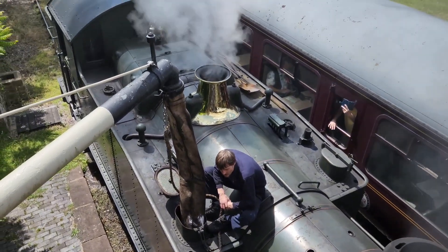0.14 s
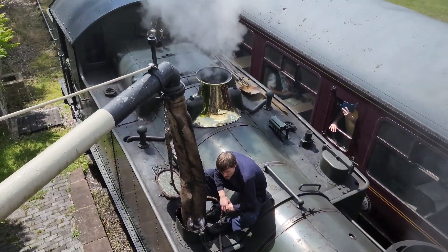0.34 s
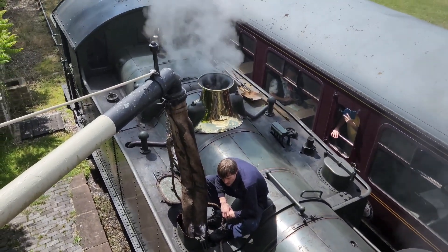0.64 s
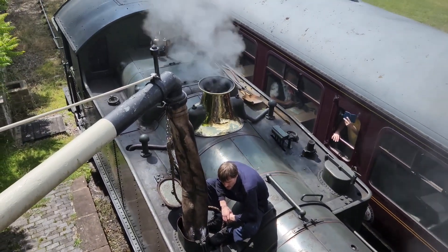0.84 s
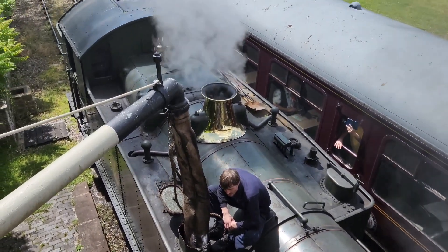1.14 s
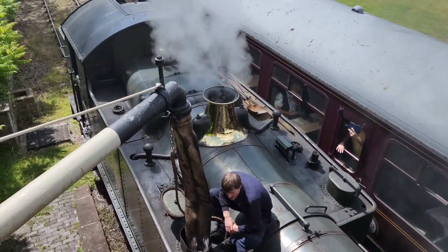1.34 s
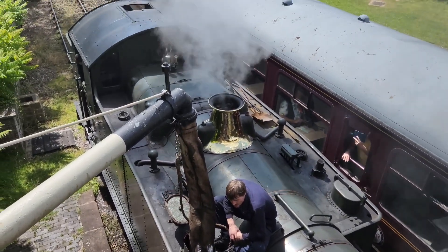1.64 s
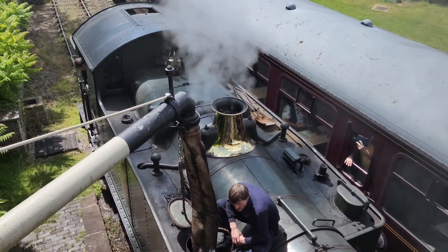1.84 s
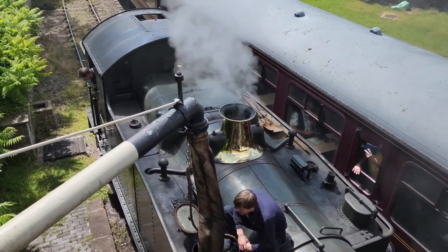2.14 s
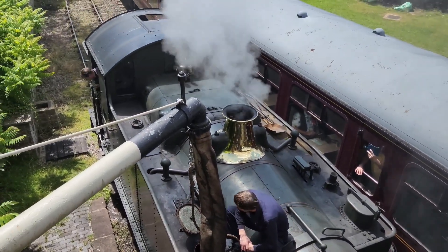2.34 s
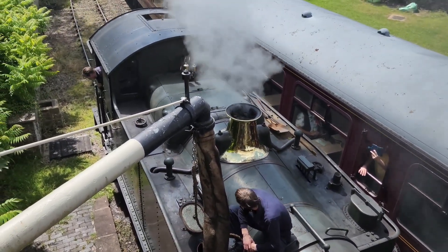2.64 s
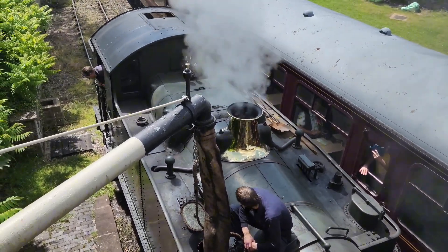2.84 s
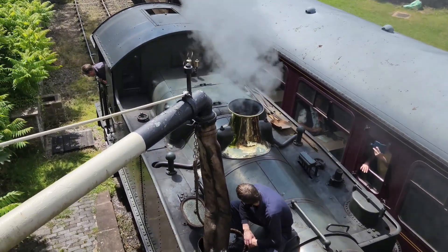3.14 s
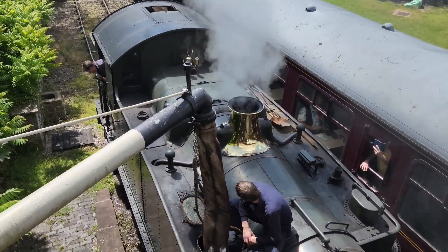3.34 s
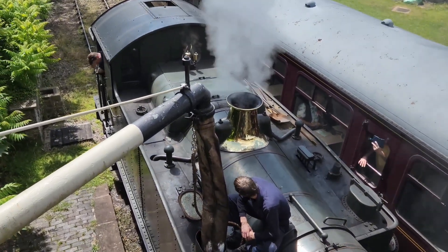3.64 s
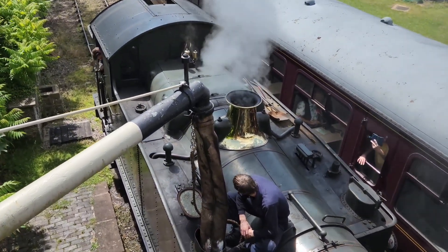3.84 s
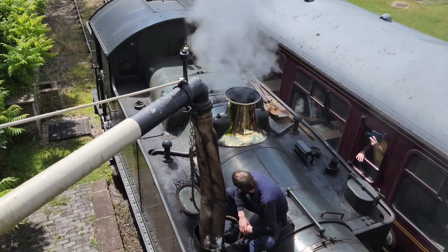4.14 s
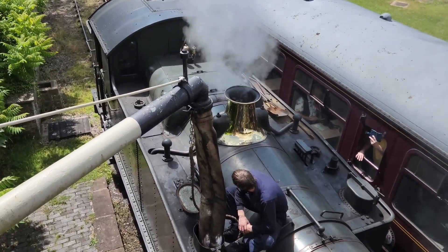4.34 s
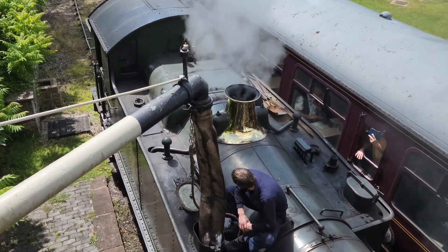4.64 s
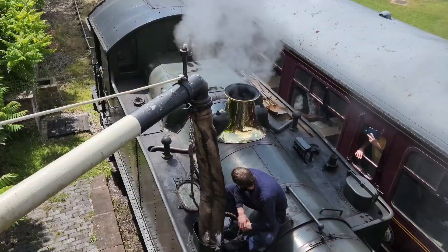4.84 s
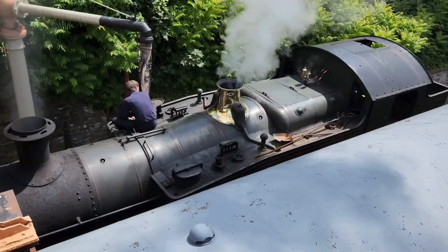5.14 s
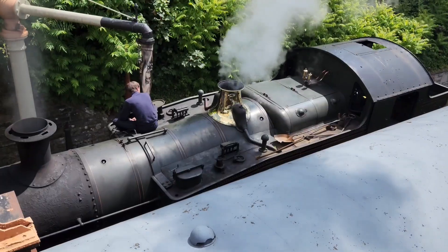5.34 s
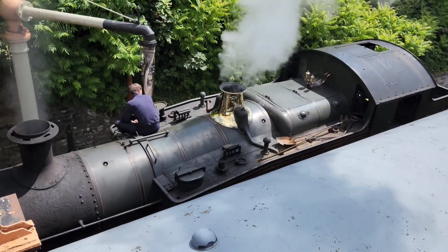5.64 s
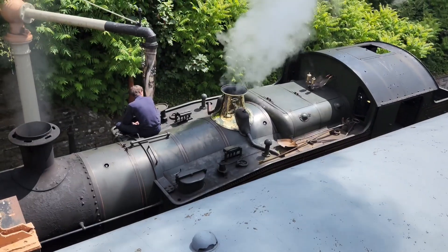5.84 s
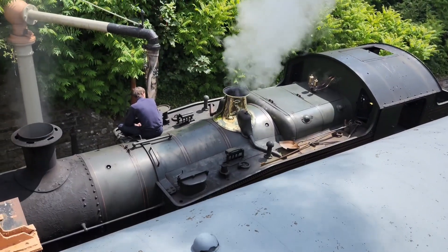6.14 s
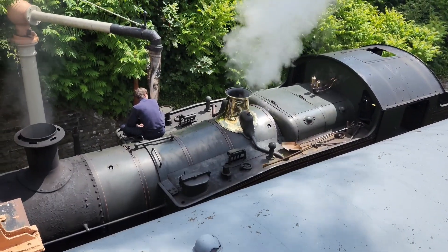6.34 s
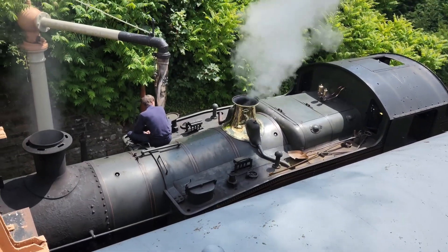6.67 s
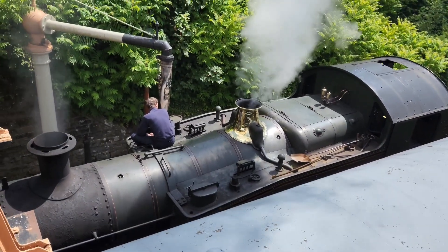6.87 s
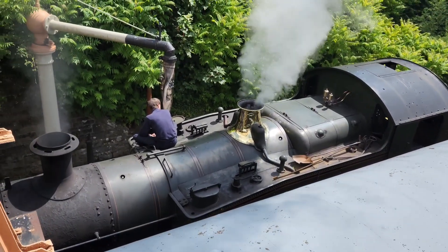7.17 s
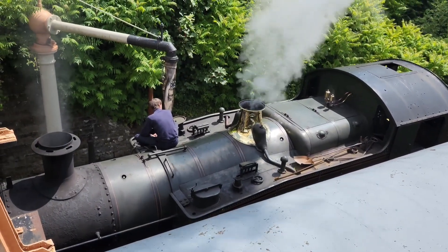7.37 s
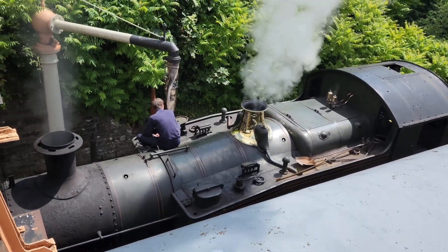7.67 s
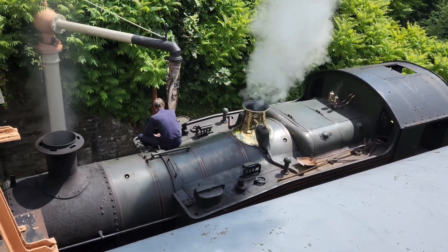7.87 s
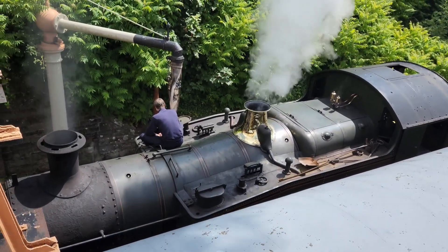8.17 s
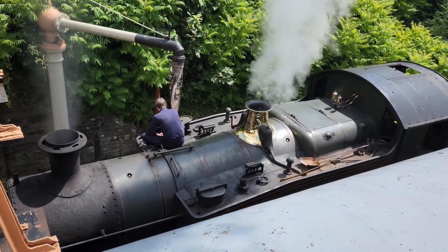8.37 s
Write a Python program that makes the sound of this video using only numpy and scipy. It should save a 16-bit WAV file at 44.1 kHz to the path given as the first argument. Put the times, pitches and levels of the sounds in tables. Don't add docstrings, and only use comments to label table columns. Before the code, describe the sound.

Loud continuous steam jet rumbles and hisses close by, drops silent for an instant at a scene change, then resumes with one dull metal knock.

```python
import sys
import numpy as np
from scipy import signal
from scipy.fft import rfft, irfft
from scipy.io import wavfile
from scipy.ndimage import uniform_filter1d

SR = 44100
rng = np.random.default_rng(int(sys.argv[2]) if len(sys.argv) > 2 else 0)


def master_out(mix):
    frames = np.transpose(np.atleast_2d(mix))
    ceiling = np.clip(frames, -1, 1)
    pcm = np.round(ceiling * 32767).astype(np.int16)
    wavfile.write(sys.argv[1], SR, pcm)


def how_loud(loudness_db):
    steps = np.asarray(loudness_db, float) / 20
    return 10 ** steps


N = 375291
FRAME = 512


def tank_knock():
    # (frequency [Hz], level [dB], decay time t60 [s])
    plate_modes = [
        (500, -29, 0.33),
        (550, -33, .3),
    ]
    knock_s, rise_s = 5.345, 0.015
    after_s = np.maximum(np.arange(N) / SR - knock_s, 0)
    ring = np.zeros(N)
    for mode_hz, mode_db, t60_s in plate_modes:
        ring += how_loud(mode_db - 60 * after_s / t60_s) * np.sin(2 * np.pi * mode_hz * after_s)
    return np.minimum(after_s / rise_s, 1) * ring


def bonnet_hum():
    # (start [s], length [s], level [dB])
    hum_bursts = [(.04, .1, -30), (.18, 0.3, -24.5), (.6, 0.31, -37), (.92, 0.31, -29), (1.304, 0.18, -22),
                  (1.7, 0.21, -33), (1.894, .14, -26), (2.24, 0.13, -33), (2.47, .11, -29),
                  (2.702, 0.12, -30), (2.873, .32, -31.5), (3.247, 0.19, -26), (3.49, 0.39, -27.5),
                  (3.81, 0.12, -26), (3.95, 0.29, -31.5), (4.22, .18, -32), (4.6, 0.69, -31)]
    base_hz, climb_hz_s, waver_hz = 221, 1.1, 1.4
    attack_s, release_s, sag_db_s, idle_db = 0.025, 0.045, 6, -41.5
    at_s = np.arange(N) / SR
    waver = np.repeat(rng.standard_normal(N // 4096 + 1), 4096)
    waver = uniform_filter1d(waver, size=4096)[:N]
    tone_hz = base_hz + climb_hz_s * at_s + waver_hz * waver
    envelope = np.full(N, how_loud(idle_db))
    for start_s, length_s, burst_db in hum_bursts:
        rise = (at_s - start_s) / attack_s
        fall = (start_s + length_s - at_s) / release_s
        gate = np.clip(np.minimum(rise, fall), 0, 1)
        envelope += how_loud(burst_db - sag_db_s * np.abs(at_s - start_s)) * gate
    tone = np.sqrt(2) * np.sin(2 * np.pi * np.cumsum(tone_hz) / SR)
    port_gain = how_loud(-6.0 + np.array([[1.4], [-1.4]]))
    return tone * envelope * port_gain


def short_spectra(x):
    return signal.stft(x, SR, nperseg=FRAME)


def eddies(shape, rate_hz, bins):
    field = rng.standard_normal(shape)
    smooth_frames = max(int(2 * SR / FRAME / rate_hz), 1)
    for axis, size in enumerate([bins, smooth_frames]):
        field = uniform_filter1d(field, size, axis=axis)
        field = uniform_filter1d(field, size, axis=axis)
    return field / field.std()


def stir(bin_hz, spectra, field_db, lag_s):
    delay = np.exp(-2j * np.pi * np.outer(bin_hz, lag_s))
    return signal.istft(spectra * how_loud(field_db) * delay, SR, nperseg=FRAME)[1][:N]


def valve_jet(colour, hand, turn_tilt, level_db):
    layer_hz = [
        250,
        800,
        7500,
        10500,
    ]
    # (time [s], centre [Hz], depth [dB])
    finger_shade = [
        (0, 7900, -3.5),
        (1.0, 7900, -4),
        (1.2, 8600, -4),
        (1.45, 10600, -3),
        (1.7, 10800, -1),
        (3.0, 10800, -1.5),
        (3.6, 10800, 0),
    ]
    shade_width_hz, top_hz = 350, 15750
    bin_hz, frame_s, direct = short_spectra(rng.standard_normal(N))

    hand_s, lag_us, valve_db = np.transpose(hand)
    lag_us = uniform_filter1d(np.interp(frame_s, hand_s, lag_us), size=25, mode="nearest")
    valve_db = uniform_filter1d(np.interp(frame_s, hand_s, valve_db), size=25, mode="nearest")
    lag_s = lag_us * 1e-6
    rumble_db, roar_db, *hiss_db = (db + tilt * lag_us + part * valve_db for db, tilt, part in turn_tilt)

    turbulence_db = 0.25 * eddies(direct.shape, 4.6, bins=200)
    turbulence_db = turbulence_db + 0.5 * eddies(direct.shape, 4.8, bins=5)
    turbulence_db = turbulence_db + 0.4 * eddies(direct.shape, 40.0, bins=60)

    log_layer, log_bin = np.log(layer_hz), np.log(bin_hz + 1)
    layer_share = np.array([np.interp(log_bin, log_layer, row) for row in np.eye(4)]).T
    shade_s, centre_hz, depth_db = np.transpose(finger_shade)
    centre_hz = np.interp(frame_s, shade_s, centre_hz)
    depth_db = np.interp(frame_s, shade_s, depth_db)
    shade_db = depth_db * np.exp(-0.5 * ((bin_hz[:, None] - centre_hz) / shade_width_hz) ** 2)

    point_hz, *curves = np.transpose(colour)
    log_point = np.log(point_hz)
    log_hz = np.log(np.fft.rfftfreq(N, 1 / SR) + 1)
    left_db, right_db, likeness, phase_rad = (np.interp(log_hz, log_point, curve) for curve in curves)
    likeness = np.clip(likeness, 0, 1) ** 0.68
    below_db = 12.0 * np.minimum(log_hz - log_point[0], 0)
    passband = log_hz < np.log(top_hz)

    ports = []
    for port_db, port_hiss_db, is_left in zip((left_db, right_db), hiss_db, (1, 0)):
        flow_db = layer_share @ np.array([rumble_db, roar_db, roar_db, port_hiss_db])
        flow_db = flow_db + (1 - is_left) * shade_db + turbulence_db
        near = stir(bin_hz, direct, flow_db, is_left * lag_s)
        wander_db = 0.8 * eddies(direct.shape, 5.1, bins=6)
        scatter = short_spectra(rng.standard_normal(N))[2]
        scattered = stir(bin_hz, scatter, flow_db + wander_db, 0 * frame_s)
        mix = np.sqrt(likeness) * np.exp(1j * is_left * phase_rad) * rfft(near)
        mix = mix + np.sqrt(1 - likeness) * rfft(scattered)
        ports.append(irfft(mix * how_loud(port_db + below_db) * passband, N))
    return how_loud(level_db) * np.array(ports) / np.std(ports)


def jet_above_tank():
    # (frequency [Hz], left level [dB], right level [dB], likeness [0-1], left phase [rad])
    above_rumble = [(21, -23, -23.5, .7, 0), (50, -7, -8.5, .94, 0), (98, 2.2, 0, .98, -.1),
                    (215, 1.3, -1.5, .98, -.1), (255, -4, -7, .94, -.1), (290, -6.5, -9.5, .92, -.2),
                    (308, -2.5, -5.5, .94, -.2), (357, -9, -11.5, .89, -.3), (385, -3, -5.3, .91, -.2),
                    (412, -11.5, -15, .56, -.3), (535, -11.3, -15.8, .71, -.1), (556, -6, -9.6, .92, 0),
                    (665, -1.5, -5.5, .91, -.2), (712, -8.2, -10.3, .84, 0)]
    above_roar = [(742, -4.4, -8.9, 0.83, -0.2), (877, -9.0, -11.2, 0.49, 0.1),
                  (1038, -1.8, -9.4, 0.82, -0.4), (1259, -2.9, -3.1, 0.84, -0.8),
                  (1329, -8.2, -4.8, 0.72, -0.7), (1469, -4.3, 0.1, 0.73, -0.2),
                  (1512, -8.6, -4.9, 0.51, 0.3), (1771, -2.3, -8.5, 0.44, 0.5),
                  (2142, 1.4, -4.7, 0.61, -0.1), (2309, -2.7, -4.7, 0.24, -0.6),
                  (2519, 1.8, -1.2, 0.63, 0.2), (2697, -1.9, -5.1, 0.41, 0.4)]
    above_rush = [(2783, -1.4, -4.4, 0.45, 0.7), (2923, 1.1, -3.5, 0.57, 0.6),
                  (3472, -1.4, -4.6, 0.59, 0.7), (3870, 0.6, -2.1, 0.5, 0.0), (4177, -2.9, -2.8, 0.45, 0.3),
                  (4618, -0.3, -1.6, 0.7, 0.3), (4866, -2.8, -5.2, 0.64, 0.1),
                  (5313, -1.1, -5.1, 0.63, -0.4), (5787, -3.8, -6.9, 0.51, -0.4),
                  (6158, -2.6, -4.0, 0.5, -0.6), (6702, -3.9, -6.0, 0.44, -0.1),
                  (6998, -2.2, -5.2, 0.38, -0.1)]
    above_hiss = [(7154, 0.5, -3.0, 0.44, 0.1), (7972, -1.4, -6.1, 0.05, -1.9),
                  (8510, 1.0, -4.3, 0.22, -0.2), (9883, -7.7, -5.3, 0.52, 0.1),
                  (10750, -4.5, -5.7, 0.53, 0.2), (11428, -2.0, -1.5, 0.4, -0.1),
                  (12295, -4.2, -2.7, 0.32, -0.9), (13382, -3.8, -3.8, 0.24, -0.4),
                  (14034, -2.8, -1.5, 0.41, 0.1), (14944, -5.5, -4.9, 0.44, 0.3),
                  (15579, -2.9, -4.3, 0.41, 0.4), (15697, -2.6, -4.2, 0.39, 0.4)]
    # (time [s], left port lag [us], flow [dB])
    above_hand = [
        (0, -1, 0.4),
        (.85, -3, 0.8),
        (1.2, -5, 0.4),
        (1.52, 10, 1.2),
        (1.8, 15, 0.2),
        (2.6, 42, 0),
        (3.05, 25, 1),
        (4.2, -5, 0),
        (5.05, 5, 0.85),
    ]
    # (level facing the jet [dB], tilt [dB/us], share of flow [ratio])
    above_tilt = [
        (1.2, -0.0346, .3),
        (0.17, 0.01, .6),
        (-0.2, .022, 1.1),
        (-0.9, 0.0767, 1.1),
    ]
    colour = above_rumble + above_roar + above_rush + above_hiss
    return valve_jet(colour, above_hand, above_tilt, level_db=-13)


def jet_across_roof():
    # (frequency [Hz], left level [dB], right level [dB], likeness [0-1], left phase [rad])
    across_rumble = [(21, -18.7, -18.7, 0.88, -0.1), (48, -6.8, -7.8, 0.97, -0.1),
                     (107, 0.3, -1.7, 0.99, -0.0), (226, -1.8, -5.1, 0.99, 0.1),
                     (253, -5.5, -9.7, 0.97, 0.2), (279, -2.2, -7.0, 0.97, 0.1),
                     (436, -14.3, -19.6, 0.63, 0.4), (473, -10.2, -14.8, 0.78, 0.3),
                     (495, -13.2, -15.6, 0.74, -0.2), (554, -9.0, -10.8, 0.77, -0.1),
                     (581, -12.0, -12.0, 0.85, -0.3), (715, -10.1, -8.6, 0.93, 0.2)]
    across_roar = [(742, -4.5, -4.6, 0.97, 0.3), (1055, -4.6, -9.3, 0.86, 0.4),
                   (1146, -3.3, -8.6, 0.9, 0.3), (1205, 0.5, -5.9, 0.9, 0.3),
                   (1367, -8.9, -16.2, 0.59, -0.1), (1442, -6.4, -11.5, 0.7, -0.3),
                   (1523, -9.9, -10.3, 0.62, -0.3), (1566, -6.3, -7.2, 0.82, 0.2),
                   (1943, 0.8, -2.1, 0.86, -0.1), (2110, -4.0, -5.3, 0.6, 0.3),
                   (2336, -0.6, -3.9, 0.78, 0.5), (2697, -1.7, -6.4, 0.56, 0.0)]
    across_rush = [(2783, -0.9, -4.6, 0.59, -0.3), (3138, -3.4, -4.6, 0.61, 0.1),
                   (3698, -1.0, -2.8, 0.71, -0.0), (4198, -3.8, -5.9, 0.62, 0.0),
                   (4484, -2.9, -4.3, 0.72, 0.5), (4780, -0.3, -5.0, 0.66, 0.6),
                   (5028, -2.8, -7.9, 0.51, 0.2), (5367, 0.6, -4.6, 0.56, -0.1),
                   (5700, -3.3, -6.3, 0.46, -0.2), (6298, 1.1, -4.2, 0.32, -0.4),
                   (6750, -3.5, -8.3, 0.3, 0.7), (6998, -0.8, -7.1, 0.26, 0.7)]
    across_hiss = [(7154, 0.1, -5.8, 0.24, -0.1), (8575, 1.0, -5.5, 0.7, -0.4),
                   (9759, -8.4, -8.2, 0.72, -0.1), (10352, -4.6, -5.4, 0.6, 0.6),
                   (11051, -4.7, -7.7, 0.21, 0.6), (11520, -2.1, -1.9, 0.39, -0.3),
                   (12257, -3.7, -5.0, 0.46, -0.0), (12779, -1.5, -2.8, 0.7, -0.6),
                   (13549, -3.0, -2.3, 0.67, 0.0), (15207, -3.7, -5.0, 0.55, 0.5),
                   (15606, 0.4, -3.8, 0.58, 0.2), (15697, 0.1, -4.0, 0.56, 0.2)]
    # (time [s], left port lag [us], flow [dB])
    across_hand = [
        (5.1, 0, 0.06),
        (5.44, 8, .1),
        (5.95, 26, 0.5),
        (6.4, 28, 0.1),
        (6.8, 60, -0.1),
        (7.25, 45, -0.9),
        (7.5, 41, .2),
        (8.51, 47, 0.2),
    ]
    # (level facing the jet [dB], tilt [dB/us], share of flow [ratio])
    across_tilt = [
        (1.35, -0.055, -0.98),
        (-1.03, 0.02, -0.14),
        (-2.2, .05, 1.2),
        (-3, 0.063, 1.4),
    ]
    colour = across_rumble + across_roar + across_rush + across_hiss
    return valve_jet(colour, across_hand, across_tilt, level_db=-14)


def scene():
    cut_s, silent_s, return_s, return_rise_s = 5.0538, 5.0772, 5.0998, 0.0008
    drop_db, fade_db_s, floor_db = -20, 5000, -49
    at_s = np.arange(N) / SR
    above = bonnet_hum() + jet_above_tank()
    across = tank_knock() + jet_across_roof()
    fade_db = np.maximum(drop_db - fade_db_s * (at_s - cut_s), floor_db) * (at_s > cut_s)
    leaving = how_loud(fade_db) * (at_s < silent_s)
    returning = np.clip((at_s - return_s) / return_rise_s, 0, 1) ** 4
    return above * leaving + across * returning


def top_cut(x):
    return signal.sosfilt(signal.butter(12, 15750, fs=SR, output="sos"), x)


def record(dry):
    return top_cut(np.clip(dry, -1, 1))


dry = scene()
out = record(dry)
master_out(out)
```